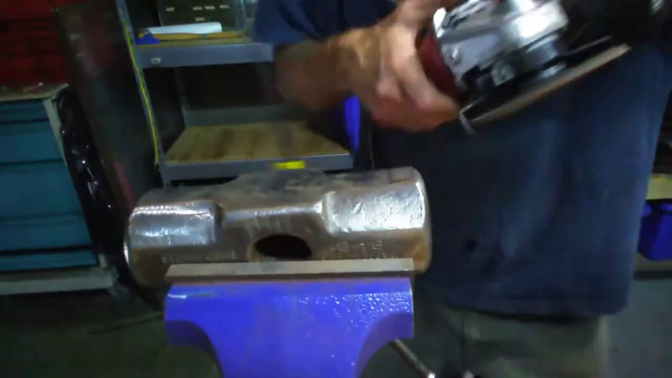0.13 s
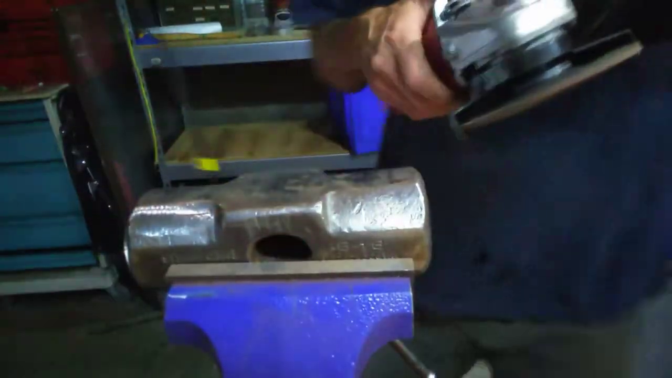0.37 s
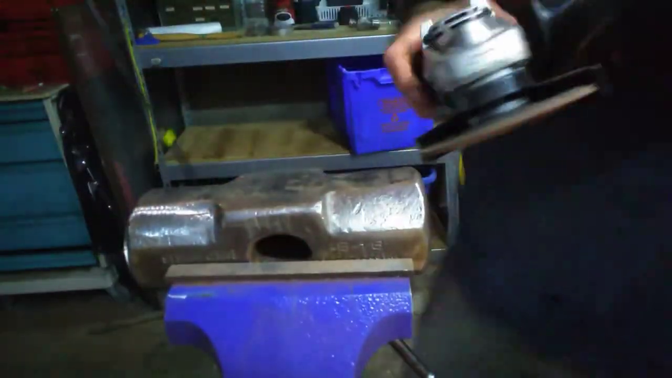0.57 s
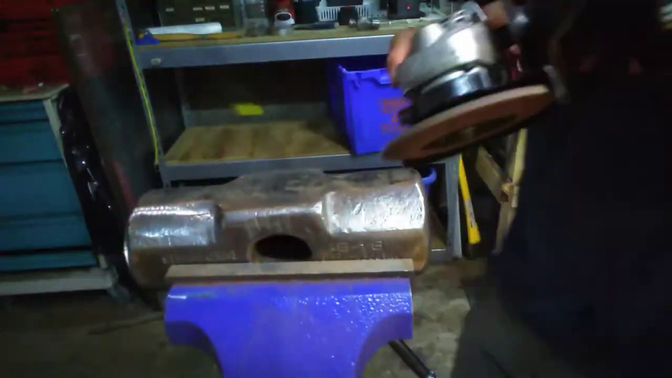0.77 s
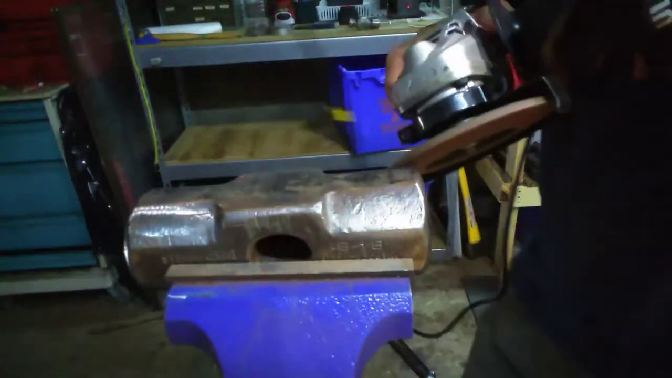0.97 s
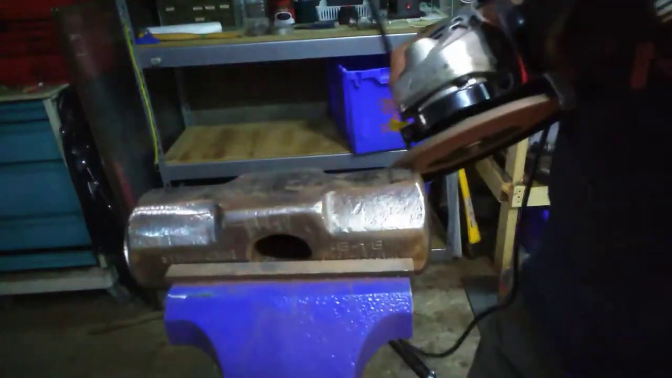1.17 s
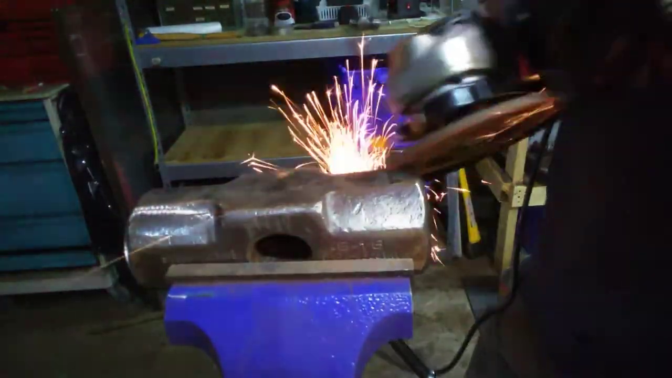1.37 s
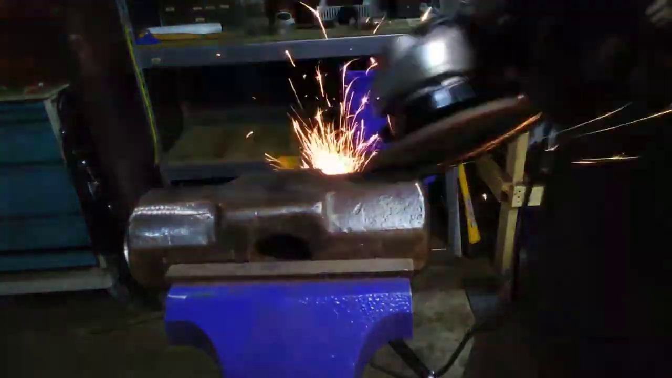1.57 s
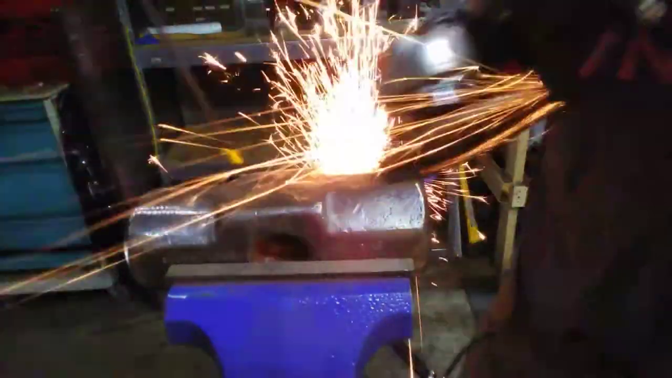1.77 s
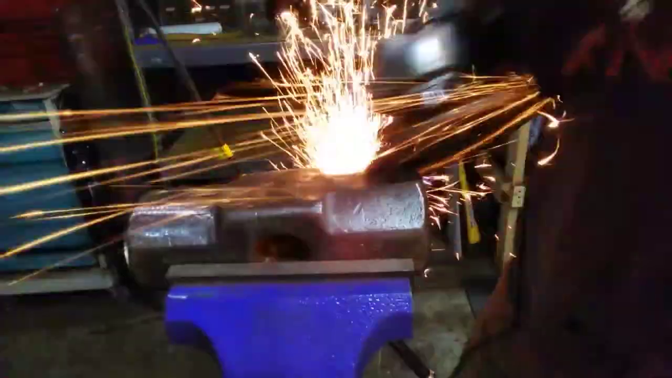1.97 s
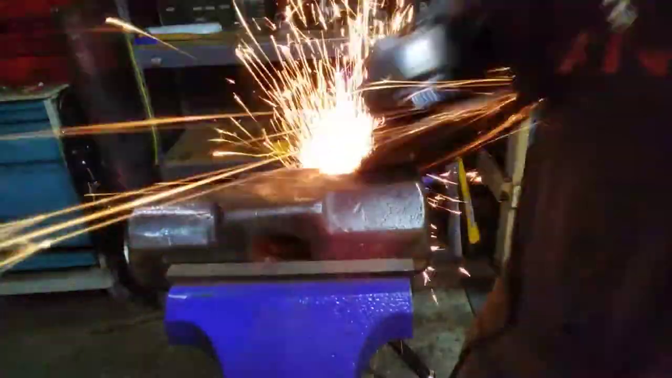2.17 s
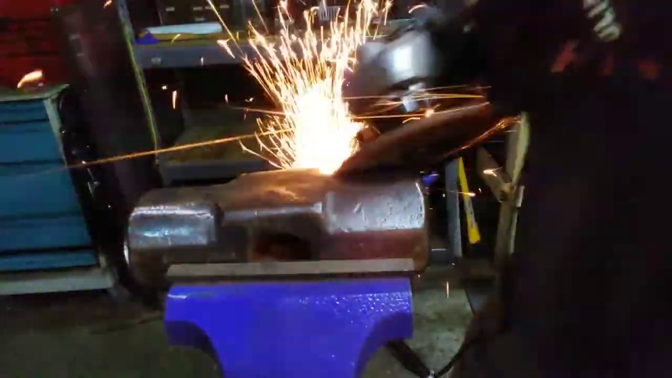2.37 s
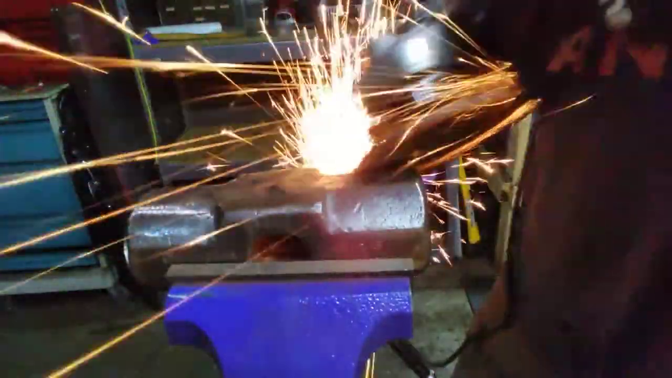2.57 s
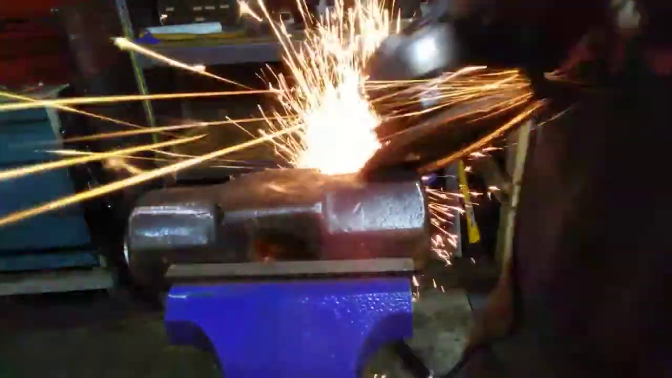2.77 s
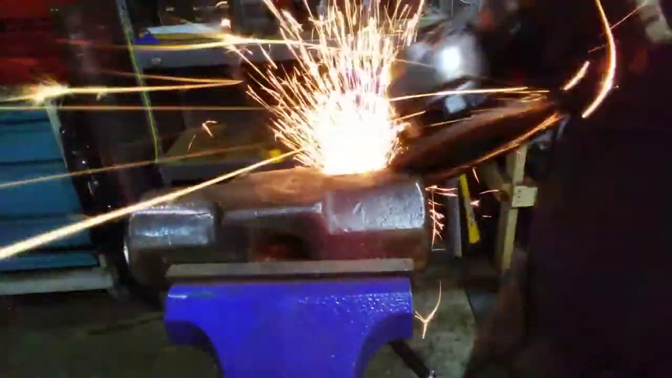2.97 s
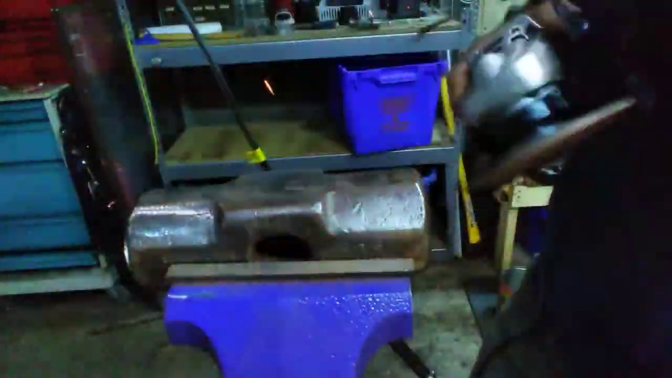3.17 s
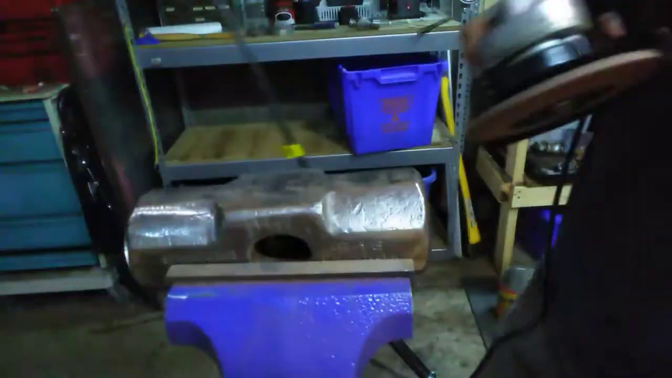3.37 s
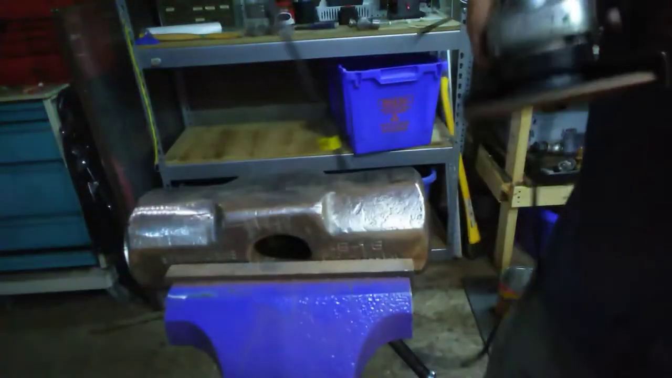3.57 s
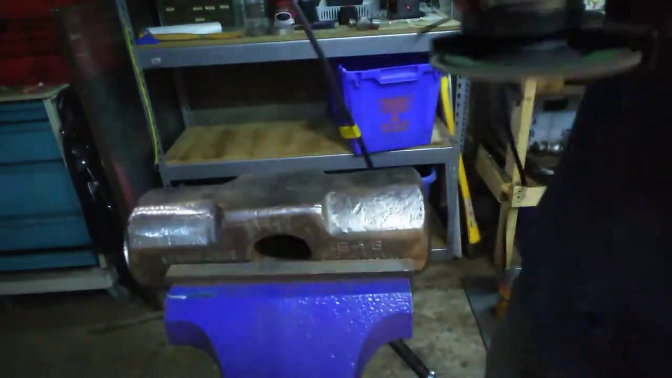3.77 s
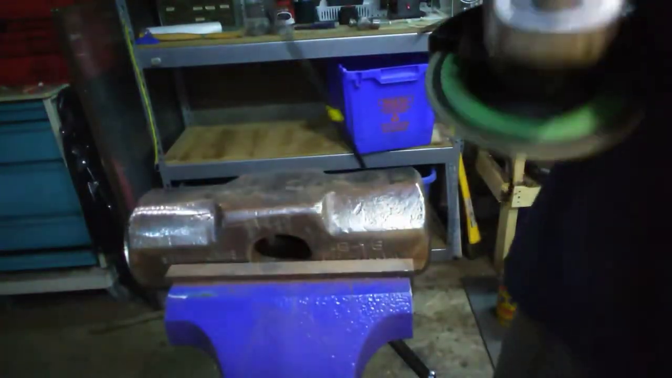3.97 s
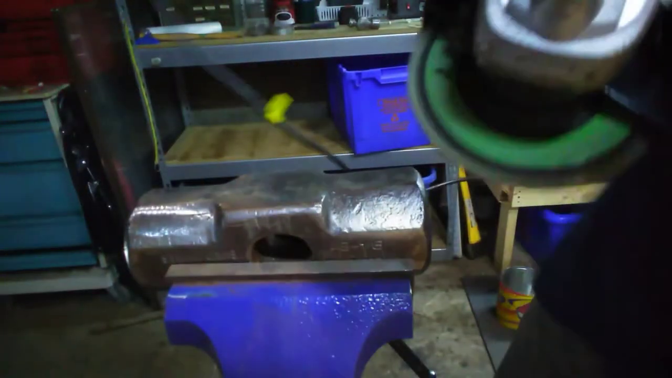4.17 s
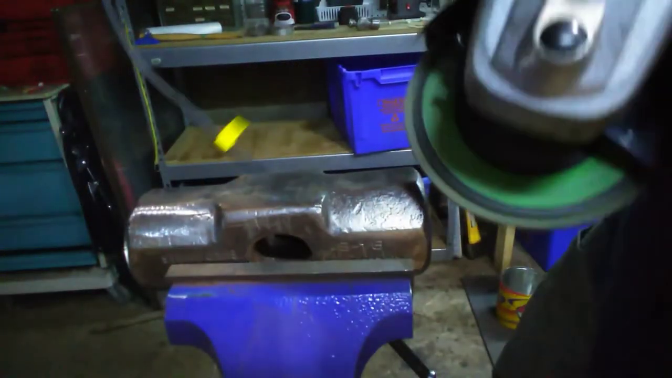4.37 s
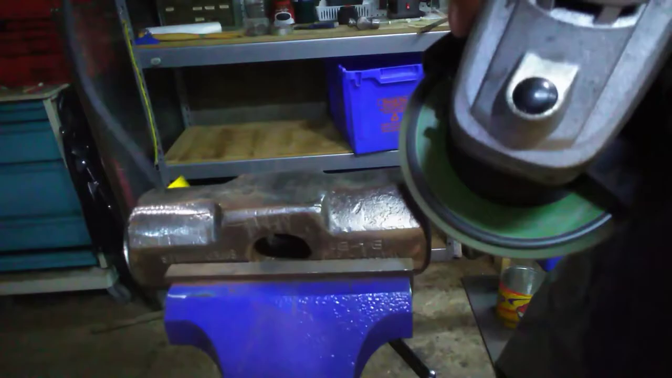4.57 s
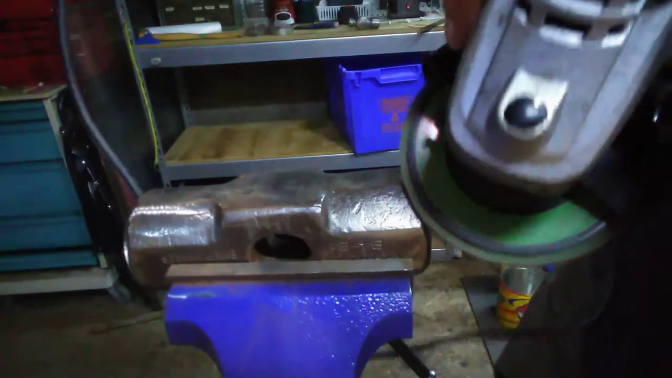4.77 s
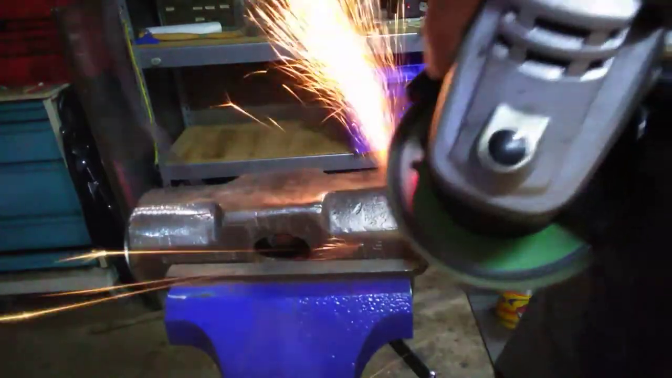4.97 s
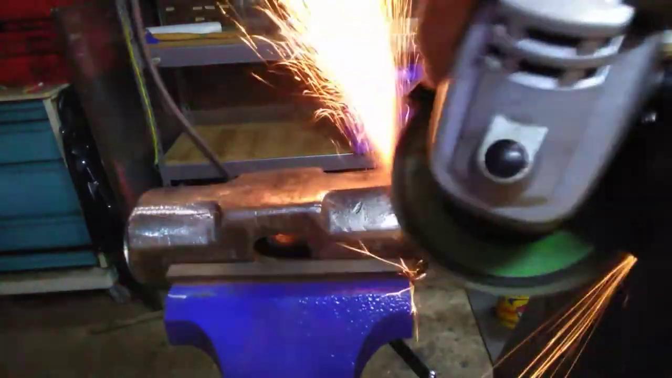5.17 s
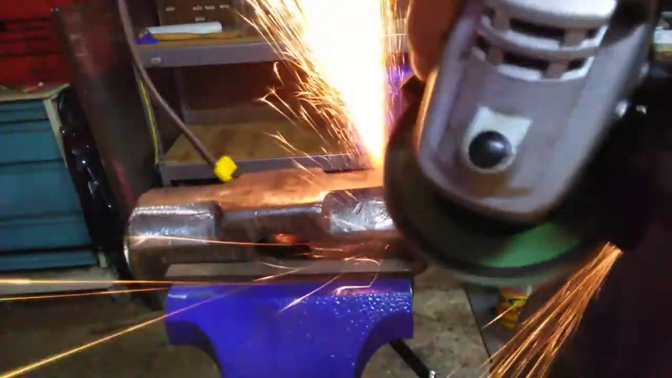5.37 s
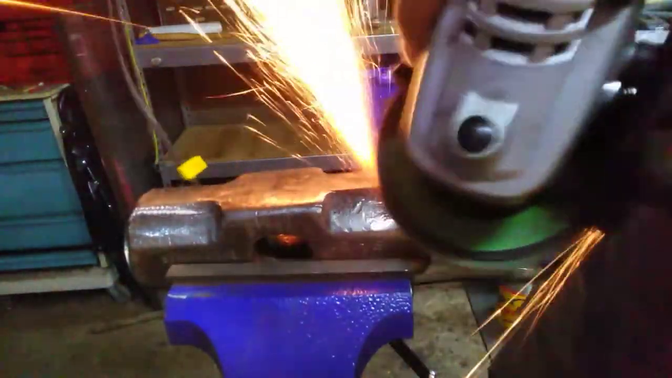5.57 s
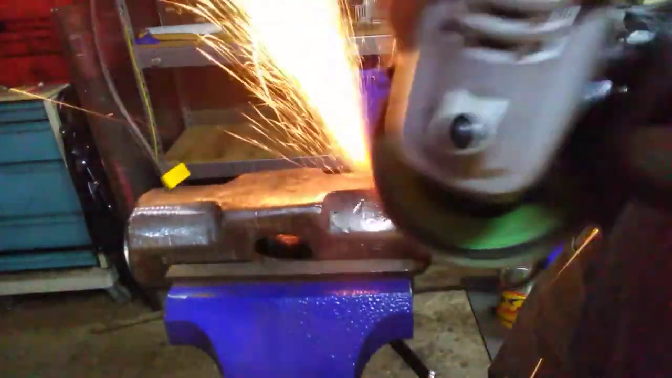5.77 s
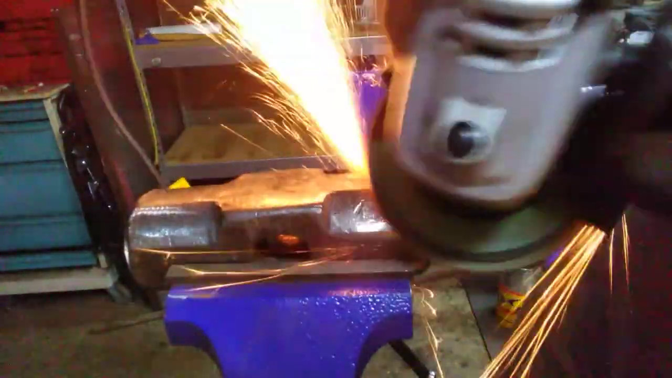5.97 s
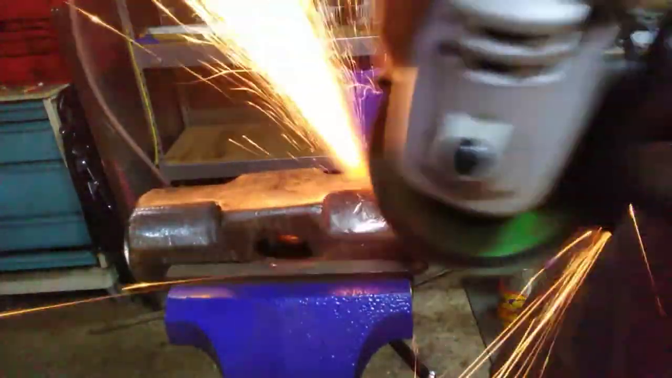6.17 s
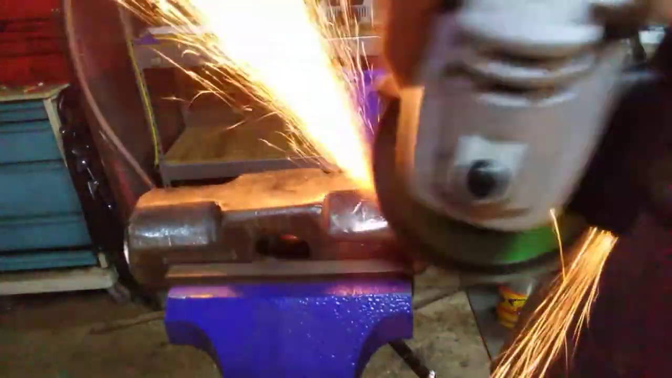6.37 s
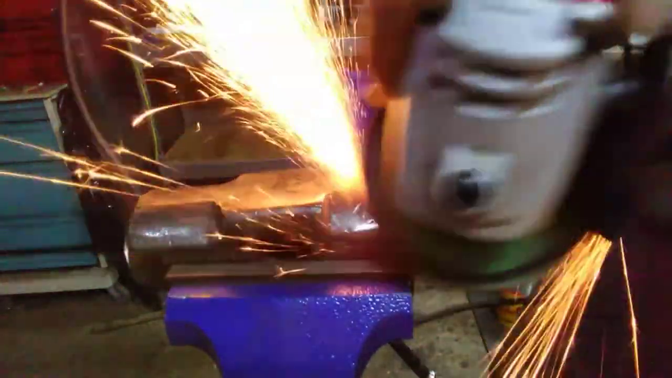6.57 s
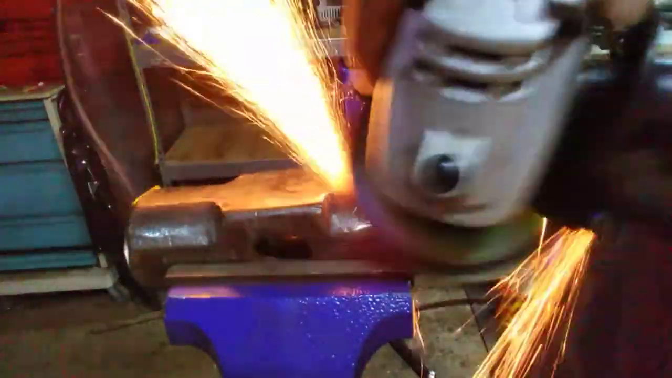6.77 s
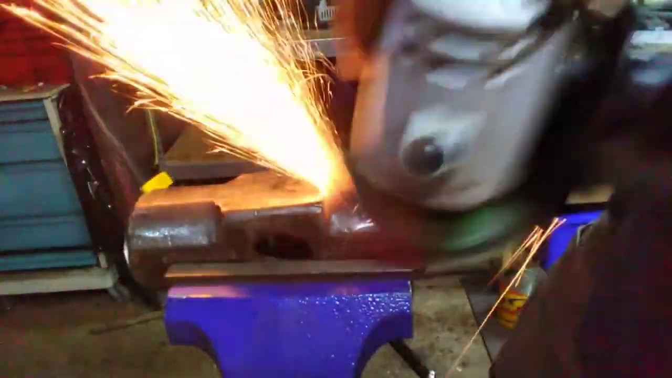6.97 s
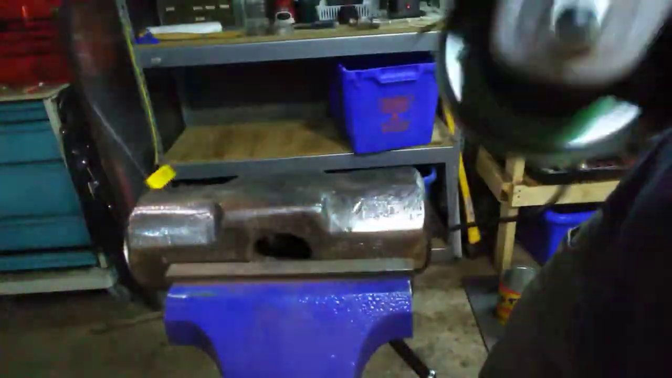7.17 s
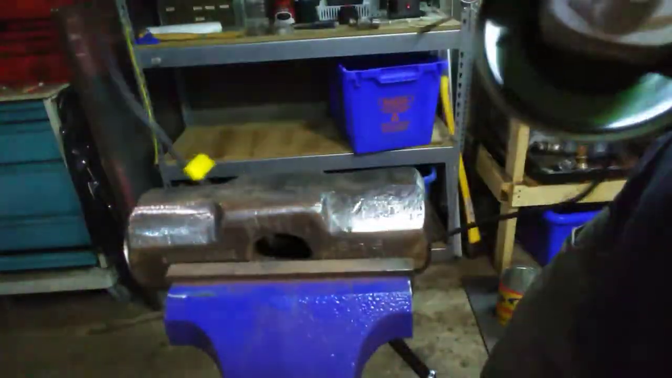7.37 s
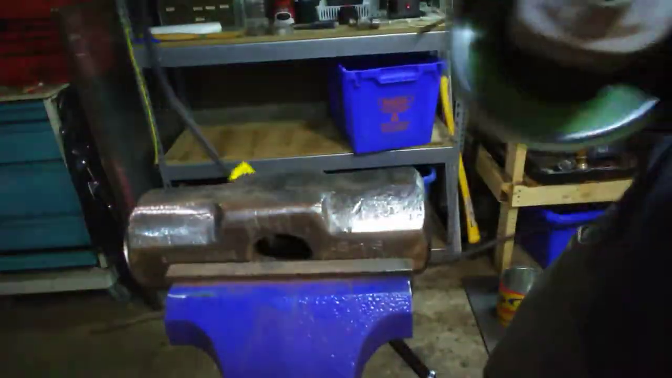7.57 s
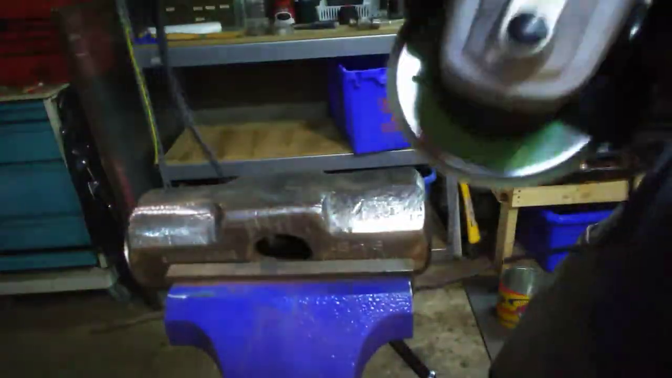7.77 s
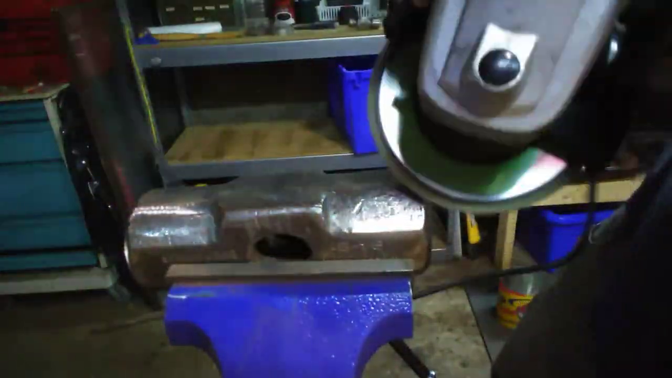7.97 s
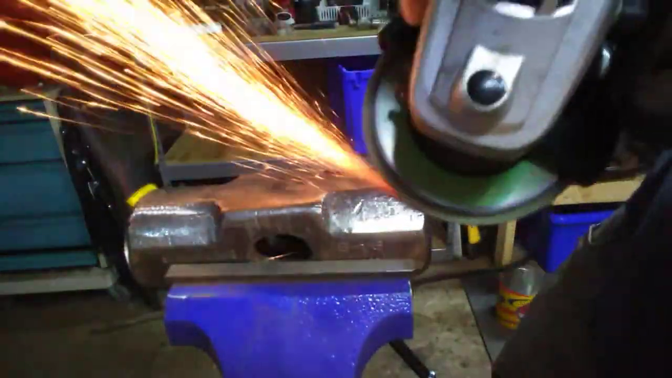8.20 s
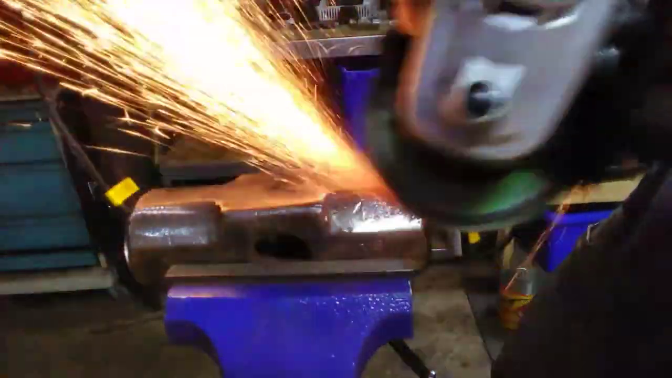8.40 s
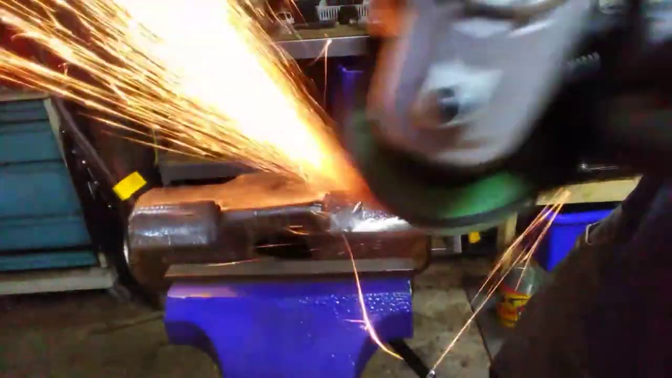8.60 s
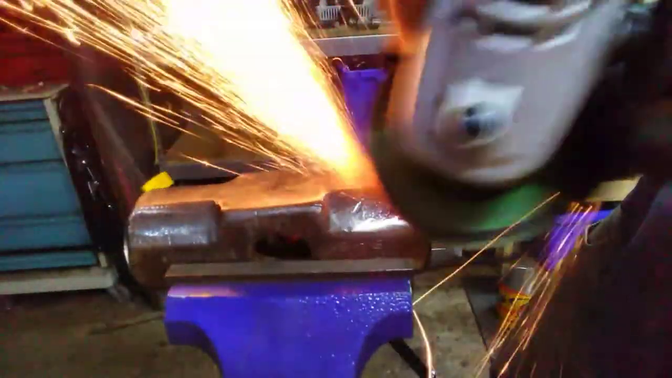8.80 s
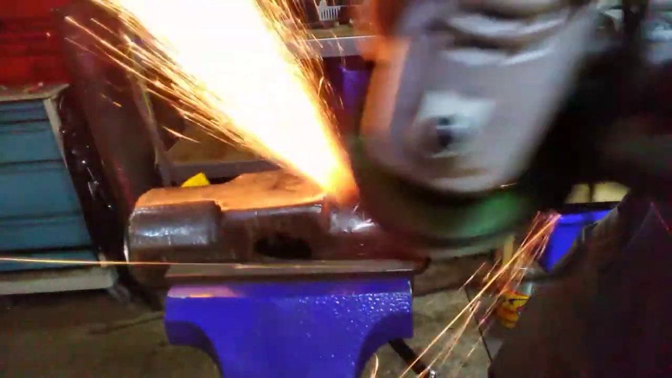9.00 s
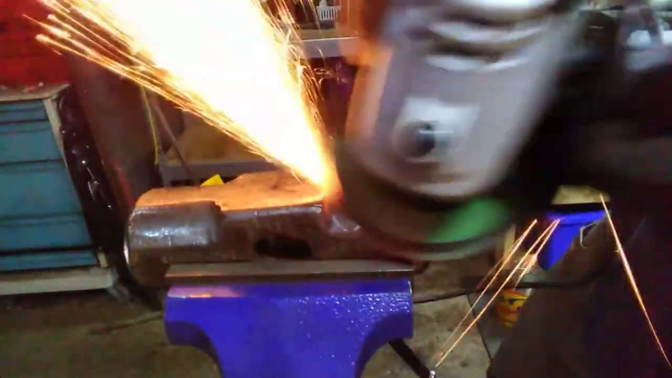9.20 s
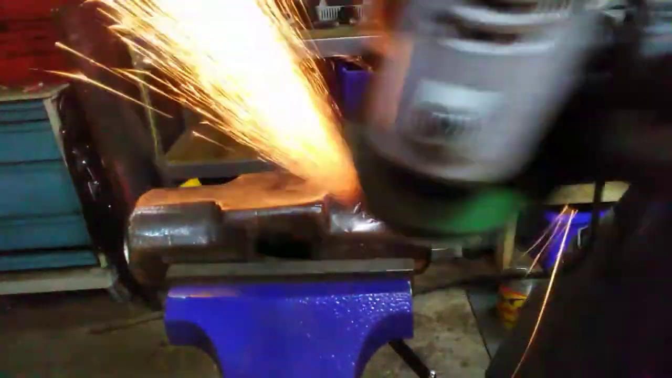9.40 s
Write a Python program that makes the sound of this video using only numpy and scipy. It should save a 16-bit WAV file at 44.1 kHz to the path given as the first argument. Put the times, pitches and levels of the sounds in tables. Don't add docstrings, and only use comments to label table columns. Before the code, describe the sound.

A handheld grinder about half a metre from a phone: rushing fan noise and motor whine swell, then steel contact brings dense hissing scrape, a high singing rasp from the disc flaps and a falling motor note. Two free-running pauses separate three bites. Thrown air and grit thump and crackle against the microphones, strongest in the second bite. Short indoor reverberation; gain dips during grinding.

```python
import sys
import numpy as np
from scipy import signal
from scipy.fft import rfft, irfft, next_fast_len
from scipy.io import wavfile
from scipy.ndimage import uniform_filter1d, map_coordinates

SR = 44100
rng = np.random.default_rng(int(sys.argv[2]) if len(sys.argv) > 2 else 0)


def to_wav(sig):
    pcm = np.clip(np.atleast_2d(sig), -1, 1) * 32767
    pcm = np.round(pcm).astype(np.int16)
    wavfile.write(sys.argv[1], SR, pcm.T)


def to_linear_factor(level_db):
    exponent = np.asarray(level_db, float) / 20
    return 10 ** exponent


N = 416304
T = np.arange(N) / SR
SIZE = next_fast_len(N + 8192)
HZ = np.fft.rfftfreq(SIZE, 1 / SR)

# t/s, rate/(turns/s)
SPEED = [(0, 167), (.6, 174), (1.4, 178.5), (1.9, 168.5), (2.5, 153), (3.25, 151), (3.8, 169), (4.2, 174),
         (5.07, 178), (5.75, 156), (6.2, 146), (7.2, 139.5), (7.45, 154), (7.8, 167), (8.3, 173),
         (8.7, 159), (9, 155), (9.44, 150)]
# t/s, roar level/dB, vents towards phone/dB
MOTOR = [(0, -43, -18), (.45, -34.5, -18), (1.37, -29.5, -13), (1.42, -36, -11), (1.75, -38, -35),
         (3.23, -39.5, -62), (3.34, -40.5, -8), (3.95, -29.5, -9.5), (4.6, -30.5, 1), (4.98, -33, -1),
         (5.1, -34.5, -24), (6.6, -39.5, -3), (7.18, -34, -37), (7.21, -38.5, -8), (7.76, -32.5, -2.5),
         (8.05, -28, -6.5), (8.9, -37.5, -38), (9.44, -38, -26)]
# t/s, flap song level/dB (how flat the disc is pressed), scrape level/dB (how much rust it meets)
CONTACT = [
    [(1.38, -48, -32), (1.53, -47, -27), (1.62, -35, -32.5), (1.75, -44, -28.5), (2.2, -34.5, -29.5),
     (2.8, -34, -29.5), (2.89, -30, -34), (2.96, -37, -30), (3.23, -34, -33)],
    [(5.09, -40, -37), (5.21, -40, -27.5), (5.41, -43, -29.5), (6.3, -34.5, -32), (6.4, -23.5, -45),
     (6.45, -33, -51), (6.55, -24.5, -47), (6.84, -27, -42), (7.19, -30, -37)],
    [(8.3, -35, -28), (8.48, -28, -38), (8.67, -38, -32), (8.72, -34, -31), (8.84, -52, -30.5),
     (8.92, -34, -28.5), (8.98, -60, -29.5), (9.44, -48, -28)],
]


def read(table):
    s, *columns = np.transpose(table)
    return [np.interp(T, s, c) for c in columns]


def over_hz(points):
    hz, value = np.transpose(points)
    return np.interp(np.log(HZ + 1), np.log(hz), value)


def shape(x, gain):
    return irfft(rfft(x, SIZE) * gain, SIZE)[..., :N]


def unit(x):
    return x / np.sqrt(np.mean(x ** 2))


def walk(rate):
    held = np.repeat(rng.standard_normal(int(N / SR * rate) + 2), 8)
    slewed = unit(uniform_filter1d(uniform_filter1d(held, size=8), size=8))
    return np.interp(T * rate * 8, np.arange(len(held)), slewed)


def stack(turns, table, wander_db):
    total = 0
    for order, db in table:
        level = to_linear_factor(db + wander_db * walk(8))
        phase = 2 * np.pi * order * turns + .45 * walk(10) + .2 * walk(45)
        total = total + level * np.sin(phase)
    return total


def biting():
    on = sum((T > rows[0][0]) * (T < rows[-1][0]) for rows in CONTACT)
    return uniform_filter1d(on * 1., size=4000)


def fan():
    # f/Hz, level/dB
    roar_spectrum = [(100, -25), (260, -12), (550, -7.5), (1000, -5.5), (1500, -2.5), (5500, -2),
                     (9500, -7.5), (14500, -14)]
    # f/Hz, width/Hz, level/dB
    vent_resonance = (3300, 900, -14)
    lag_s, alike_hz = 0.00024, 1400
    roar_db, vent_db = read(MOTOR)
    noise = rfft(rng.standard_normal((3, N)), SIZE)
    alike = .9 / (1 + (HZ / alike_hz) ** 2)
    later = np.exp(-2j * np.pi * HZ * np.array([[lag_s], [0]]))
    noise = np.sqrt(alike) * noise[0] * later + np.sqrt(1 - alike) * noise[1:]
    colour = noise * to_linear_factor(over_hz(roar_spectrum)) / (1 + (110 / (HZ + 1)) ** 4)
    swell, roar = walk(7), 0
    body_db = -0.27 * (vent_db.clip(-14) + 8)
    for octave in np.arange(7, 15):
        band = np.clip(1 - abs(np.log2(np.maximum(HZ, 2 ** 7)) - octave), 0, 1)
        flicker_db = 0.8 * swell + 1.03 * walk(14) + body_db * (octave < 11)
        roar = roar + to_linear_factor(flicker_db) * irfft(band * colour, SIZE)[:, :N]
    hz, width, db = vent_resonance
    vent = unit(irfft(noise / (1 + (2 * (HZ - hz) / width) ** 2), SIZE)[:, :N])
    vent = vent * to_linear_factor(db + vent_db + 3.6 * walk(11.0))
    return to_linear_factor(roar_db + 5.5) * (unit(roar) + vent)


def motor(turns):
    # multiple of the turn, level/dB
    hum_orders = [(2, -18), (3, -6), (5, -5), (6, -11), (7, -6)]
    # t/s, level against the fan/dB
    whine_levels = [(0, -20), (1.1, -20), (1.3, -15.5), (1.45, -40), (3.75, -24), (3.95, -18), (4.95, -10),
                    (5.1, -25), (7.4, -23.5), (7.65, -20.5), (8.25, -14), (8.4, -16), (8.5, -14),
                    (9.44, -30)]
    teeth, case_hz, mains_hz, gear_db = 37, 5500, 60, 9
    housing_hz, housing_width_hz = 735, 35
    (roar_db, vent_db), speed, load = read(MOTOR), read(SPEED)[0], biting()

    housing = to_linear_factor(-19) / (1 + ((5 * speed - housing_hz) / housing_width_hz) ** 2)
    fifth = housing * stack(turns, [(5, 0)], wander_db=3) * to_linear_factor(3 * walk(40))

    hum_db = -23 - 0.5 * vent_db.clip(-14) - 13 * load - 5 * (T > 3.3)
    hum = to_linear_factor(hum_db) * stack(turns, hum_orders, wander_db=2.6)
    unbalance = to_linear_factor(-22.5 - 9 * load) * stack(turns, [(1, 0)], wander_db=1.5)
    whine = to_linear_factor(read(whine_levels)[0]) * stack(turns, [(4, 0)], wander_db=.4) * to_linear_factor(2 * walk(45) - .5)
    bars = to_linear_factor(-7) * (1 - load) * np.sin(2 * np.pi * 96.5 * turns + walk(100))

    throb = 1 + np.sin(2 * np.pi * mains_hz * T)
    mesh_hz = teeth * np.gradient(turns) * SR
    case = .2 / (1 + ((mesh_hz - case_hz) / 180) ** 2)
    gear = case * throb * np.sin(2 * np.pi * teeth * turns + 2.0 * walk(130))
    return to_linear_factor(roar_db + 7.5) * (hum + unbalance + whine + fifth + bars + to_linear_factor(gear_db) * gear)


def air():
    streams = [(1.773, 0.19, -38.5, -2), (1.997, 0.1, -38.5, -1), (2.163, 0.15, -36, 2.5),
               (2.364, 0.41, -37.5, -3), (2.802, 0.11, -34, 3.5), (4.313, 0.97, -50, 6),
               (5.103, 2.02, -36.5, 5.5), (5.119, 0.22, -31, 5.5), (5.416, 0.16, -34, 4.5),
               (5.625, 0.068, -32, 5), (5.803, 0.083, -30.5, 1.5), (6.01, 0.45, -33.5, 4),
               (6.476, 0.11, -32, 5.5), (6.654, 0.14, -26, -0.5), (6.886, 0.12, -30.5, 3.5),
               (7.072, 0.037, -33, 0.5), (7.163, 0.02, -32, 2.5), (7.697, .6, -60, 12),
               (8.434, 0.39, -37.5, 0), (8.435, 0.095, -33, 5.5), (8.863, 0.27, -39.5, 5.5),
               (8.868, 0.083, -34.5, 1), (9.22, 0.27, -39, 1)]
    puffs = [(0, 0.058, -41, -3), (.125, 0.02, -43, -17), (.77, 0.095, -42, -7), (.95, 0.084, -36.5, -14),
             (1.12, 0.04, -38.5, -11), (1.22, 0.092, -44.5, -4), (1.33, 0.076, -46, -13),
             (1.51, 0.047, -42, -7), (1.63, 0.028, -35.5, -3), (3.03, 0.065, -41, 1.5),
             (3.19, 0.066, -49.5, -3), (3.325, 0.019, -46.5, -8), (3.54, 0.069, -43.5, -17),
             (3.64, 0.027, -37, -6), (3.72, 0.076, -46, -13), (3.833, 0.01, -33, -16),
             (3.89, 0.045, -36, -7), (4.0, .08, -53, -10), (4.35, 0.035, -44, -14), (4.43, 0.034, -43, -14),
             (4.88, .04, -48, -12), (4.56, .12, -44.5, -11), (4.994, 0.0053, -30, -3),
             (8.325, 0.014, -39.5, 5)]
    gusts = [
        [(1.785, 0.054, -31.5, -3), (1.857, 0.023, -37, 3), (2.009, 0.013, -30.5, 2.5),
         (2.048, 0.0084, -32.5, 3.5), (2.162, 0.018, -30, -4), (2.198, 0.074, -33, -2), (2.36, 0.03, -33, 0),
         (2.399, 0.01, -41, -2), (2.444, 0.069, -38, 0), (2.544, 0.0091, -29.5, 1), (2.59, 0.026, -35, 4),
         (2.63, 0.039, -37.5, 5), (2.693, 0.036, -35.5, 1), (2.807, 0.023, -33, 1), (2.854, 0.044, -33, 6)],
        [(5.107, 0.007, -29, -6), (5.151, 0.027, -28.5, 4), (5.217, 0.021, -31, -3), (5.444, 0.032, -31, 4.5),
         (5.484, 0.026, -31, 4.5), (5.636, 0.007, -28, 5), (5.699, 0.0061, -33, 6.5), (5.756, 0.01, -30.5, 2),
         (5.817, 0.04, -29, 5), (5.888, 0.014, -30, 1.5), (6.078, 0.0088, -36.5, 10.5), (6.145, 0.018, -36, -1),
         (6.179, 0.047, -31, 3), (6.311, 0.036, -31.5, 3.5), (6.388, 0.04, -28.5, 3), (6.505, 0.018, -30, 5.5),
         (6.562, 0.024, -34, 8), (6.6, 0.023, -30, 5.5), (6.655, 0.049, -27, 8), (6.72, 0.018, -25, 10),
         (6.772, 0.02, -30, -1), (6.82, 0.012, -34, 4.5), (6.927, 0.048, -25.5, 5.5), (7.035, 0.026, -33, 5.5)],
        [(8.43, 0.006, -36.5, 11), (8.469, 0.034, -30, 5.7), (8.591, 0.056, -32.5, 2.5),
         (8.628, 0.027, -32.5, 4.5), (8.708, 0.023, -33, 3.3), (8.75, 0.0054, -31, 2.8), (8.776, 0.013, -38, 6),
         (8.878, 0.063, -31, 2), (9.035, 0.0084, -34, 5.6), (9.108, 0.0096, -34, 1), (9.145, 0.021, -31.5, 1.2),
         (9.226, 0.037, -36.5, 3), (9.303, 0.027, -34.5, 3.6), (9.349, 0.0091, -34.5, 1.6),
         (9.398, 0.0065, -30, 2.4)],
    ]
    rise_db_per_s, fall_db_per_s = 600, 502
    rumble_db, tearing_db = np.full(N, -65.), np.full(N, -66.)
    for start, length, db, sharp_db in streams + puffs + sum(gusts, []):
        end = start + length
        at = slice(max(int((start - .2) * SR), 0), int((end + .2) * SR))
        rise_db = rise_db_per_s * (start - T[at])
        fall_db = fall_db_per_s * (T[at] - end)
        edge_db = db - np.maximum(rise_db, fall_db).clip(0)
        rumble_db[at] = np.maximum(rumble_db[at], edge_db)
        tearing_db[at] = np.maximum(tearing_db[at], edge_db + sharp_db)
    return rumble_db, tearing_db


def blast(turns):
    # f/Hz, level/dB
    rumble_spectrum = [(20, -33), (50, -4.5), (100, 1.5), (170, -0.5), (300, -11.5), (600, -28)]
    tearing_spectrum = [(100, -8), (300, 2), (600, -2.5), (1200, -8), (2500, -11.5), (4500, -39),
                        (7000, -48)]
    pops_per_s, pop_db = 120, 6
    rumble_db, tearing_db = air()
    tearing_db = np.minimum(tearing_db, -23)
    gust, ports = walk(60), []
    pulse = 1 + .5 * np.cos(2 * np.pi * turns)
    for _ in range(2):
        burst_db = 0.8 * gust + 1.5 * walk(90)
        rumble = shape(rng.standard_normal(N), to_linear_factor(over_hz(rumble_spectrum)))
        rumble = unit(rumble * to_linear_factor(burst_db))
        eddies = rng.standard_normal(N) * to_linear_factor(burst_db + 2.0 * walk(300)) * pulse
        grains = (rng.random(N) < pops_per_s / SR) * rng.standard_normal(N)
        pops = grains * to_linear_factor(pop_db + 5 * rng.exponential(size=N).clip(0, 2.2))
        tearing = unit(shape(unit(eddies) + pops, to_linear_factor(over_hz(tearing_spectrum))))
        ports.append(to_linear_factor(rumble_db + 10.0) * rumble + to_linear_factor(tearing_db + 2.0) * tearing)
    return np.array(ports)


def disc(turns):
    # f/Hz, level/dB
    scrape_spectrum = [(300, 2), (1000, 0.5), (2500, -1.5), (6000, -1.5), (9000, 2.5), (11200, 5),
                       (13000, 4), (14500, -5)]
    # multiple of the turn, level/dB
    shudder_orders = [(1, 10), (2, 7), (3, 2), (4, 1), (5, 0), (6, 0), (7, -5), (8, -3)]
    bite_shudder_db = [3, -7, -6]
    flaps_per_turn, upper_per_turn, steps = 72.5, 80, 512
    controls = np.full((2, N), -120.)
    for rows in CONTACT:
        on = (T >= rows[0][0]) & (T <= rows[-1][0])
        controls = np.where(on, read(rows), controls)
    song_db, scrape_db = controls
    upper_db = np.minimum(-62 + 0.27 * (song_db + 2), song_db)

    gust_db = air()[1].clip(-54, -27)
    song_db = song_db + 0.17 * (gust_db - uniform_filter1d(gust_db, size=15000))
    song_db = song_db - 3.5 * walk(16) / 2
    bite = np.searchsorted([rows[0][0] for rows in CONTACT[1:]], T)
    shudder_db = gust_db - 5.5 + np.take(bite_shudder_db, bite)

    rim = rng.standard_normal((2000, steps))
    drift = uniform_filter1d(rng.standard_normal(len(rim)), size=15) * np.sqrt(15)
    likeness = np.clip(0.64 + 0.081 * drift, 0, .95)
    for k in range(1, len(rim)):
        rim[k] = likeness[k] * rim[k - 1] + np.sqrt(1 - likeness[k] ** 2) * rim[k]
    spectrum = rfft(rim.ravel())
    order = np.arange(rim.size // 2 + 1) / len(rim)

    def passing(gain):
        return unit(np.interp(turns * steps, np.arange(rim.size), irfft(spectrum * gain)))

    song = passing(1 / (1 + ((order - flaps_per_turn) / 3.4) ** 2))
    upper = passing(1 / (1 + ((order - upper_per_turn) / 3.5) ** 2))
    scrape = unit(shape(passing(order < 110), to_linear_factor(over_hz(scrape_spectrum))))
    flaps = to_linear_factor(song_db) * song + to_linear_factor(upper_db) * upper
    shaking = stack(turns + .02 * walk(50), shudder_orders, wander_db=4)
    shudder = biting() * to_linear_factor(shudder_db - 6) * shaking * to_linear_factor(3 * walk(60) - 2.5)
    return to_linear_factor(0.29 * walk(25)) * (flaps + to_linear_factor(scrape_db) * scrape), shudder


def workshop(x):
    lag_s, wet_db, t60, alike_hz = 0.000303, 11.0, 0.05, 1500
    t = np.arange(8192 * 2) / SR
    alike = 1 / (1 + (HZ / alike_hz) ** 2)
    place, wet = np.exp(np.array([1.4 * walk(16) for _ in range(3)])), 0
    for share in place / np.sqrt(np.sum(place ** 2, axis=0)):
        decay = np.exp(-np.log(1000) * t / t60) * (t > .004)
        tails = rng.standard_normal((3, len(t))) * decay
        tails = rfft(tails / np.sqrt(np.sum(tails[0] ** 2)), SIZE)
        response = np.sqrt(alike) * tails[0] + np.sqrt(1 - alike) * tails[1:]
        wet = wet + rfft(share * x, SIZE) * response
    direct = rfft(x, SIZE) * np.exp(-2j * np.pi * HZ * np.array([[lag_s], [0]]))
    return irfft(direct + to_linear_factor(wet_db) * wet, SIZE)[:, :N] / np.sqrt(1 + to_linear_factor(2 * wet_db))


def strikes():
    # t/s, peak level/dB, port (0 left, 1 right)
    grains = [(1.898, -19, 0), (2.008, -15, 1), (2.024, -12, 1), (2.155, -17, 0), (2.166, -16, 1),
              (2.176, -13, 1), (2.385, -17, 1), (2.45, -18, 1), (2.489, -19, 0), (2.547, -14, 1),
              (2.56, -14, 1), (2.592, -16, 1), (2.618, -16, 1), (2.637, -16, 1), (2.71, -15, 1),
              (2.814, -15, 1), (2.876, -12, 1), (3.92, -18, 1), (4.998, -16, 1), (5.11, -11, 1),
              (5.232, -8, 1), (5.373, -16, 1), (5.588, -16, 1), (5.64, -14, 1), (5.703, -14, 1),
              (6.083, -11, 1), (6.155, -14, 1), (6.195, -13, 1), (6.216, -13, 0), (6.283, -13, 1),
              (6.508, -11, 0), (6.78, -12, 1), (6.895, -12, 0), (7.159, -14, 1), (7.18, -14, 1),
              (8.432, -11, 1), (8.504, -10, 0), (8.549, -15, 1), (8.591, -15, 1), (8.605, -14, 1),
              (8.647, -15, 1), (8.718, -16, 1), (8.753, -14, 1), (8.779, -15, 0), (8.789, -17, 1),
              (8.891, -14, 1), (8.922, -15, 1), (8.948, -15, 1), (9.039, -17, 1), (9.058, -18, 0),
              (9.11, -17, 1), (9.117, -16, 1), (9.163, -18, 1), (9.234, -17, 1), (9.286, -18, 1),
              (9.329, -17, 1), (9.401, -16, 1), (9.406, -16, 0)]
    width_s = .0005
    out = np.zeros((2, N))
    for s, db, port in grains:
        out[int(port), int(s * SR)] = -to_linear_factor(db - 1.5)
    t = np.arange(-200, 201) / SR / width_s
    dent = (1 - t ** 2 / 2) * np.exp(-t ** 2 / 2)
    return signal.fftconvolve(out, [dent], mode="same")


def scene():
    turns = np.cumsum(read(SPEED)[0]) / SR
    grind, shudder = disc(turns)
    tones = motor(turns) + shudder
    tones = np.array([np.roll(tones, 11), tones])
    return tones + workshop(grind) + fan() + blast(turns) + strikes()


def low_pass(x):
    return signal.sosfilt(signal.butter(12, 14480, fs=SR, output="sos"), x)


def record(dry):
    # f/Hz, share
    cross_share = [(30, .78), (1000, .72), (2070, 1), (3100, .9), (4150, .87), (6200, .48), (8300, .32),
                   (14000, .1)]
    # t/s, length/s
    hollows = [(1.6, .07), (1.83, .05), (1.92, .13), (2.12, .05), (2.41, .05), (2.57, .13), (3.04, .05),
               (3.19, .05), (5.11, .04), (5.5, .1), (6.15, .06), (6.47, .13), (6.76, .06), (8.42, .2)]
    top_hz, delay_s = 14300, 1 / 2072
    right_db = 1.6 / (1 + (HZ / 4000) ** 2)
    ports = rfft(dry, SIZE) * to_linear_factor(np.array([-right_db, right_db])) * (HZ < top_hz)
    cross = ports[::-1] * over_hz(cross_share) * np.exp(-2j * np.pi * HZ * delay_s)
    treble = 1 / (1 + (3600 / (HZ + 1)) ** 8)
    eased = .52 * (1 - biting()) * irfft(treble * cross, SIZE)[:, :N]
    cross = irfft(cross, SIZE)[:, :N] - eased
    place = [np.arange(N) + .42 * walk(30)]
    cross = np.array([map_coordinates(side, place, order=3) for side in cross])
    wide = 0.66 * (irfft(ports, SIZE)[:, :N] - cross)
    hollowed = sum((T > s) * (T < s + length) for s, length in hollows)
    hollowed = uniform_filter1d(hollowed * 1., size=500)
    second_tooth = np.exp(-((HZ - 2 / delay_s - 60) / 420) ** 2)
    wide = wide - .85 * hollowed * shape(wide.mean(axis=0), second_tooth)
    first_tooth = np.exp(-((HZ - 1 / delay_s) / 170) ** 2)
    wide = wide - shape(wide.mean(axis=0), .7 * first_tooth)
    return low_pass(0.81 * np.tanh(wide / 0.77))


dry = scene()
out = record(dry)
to_wav(out)
```